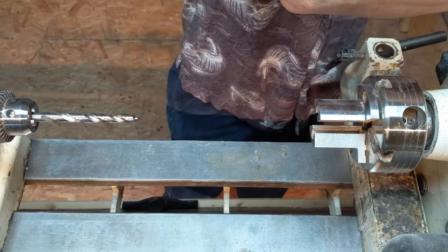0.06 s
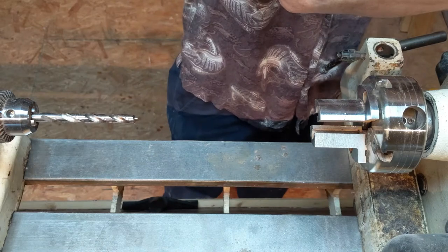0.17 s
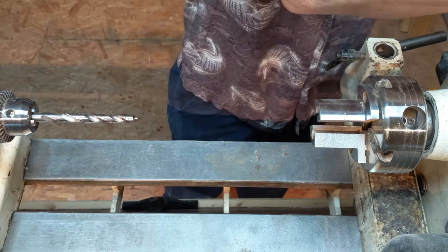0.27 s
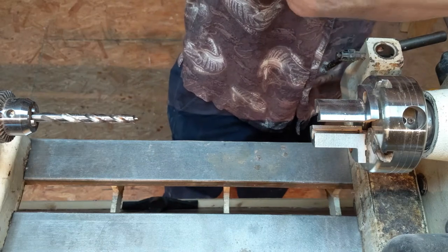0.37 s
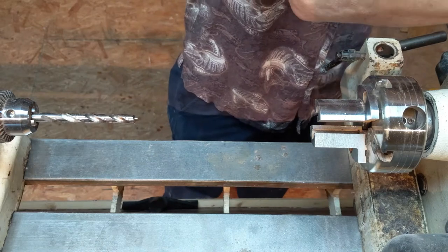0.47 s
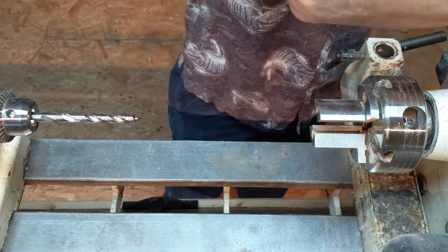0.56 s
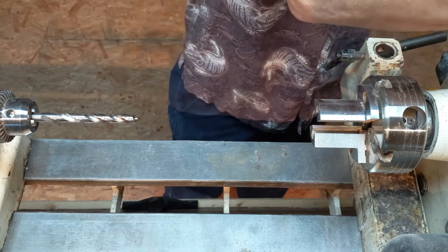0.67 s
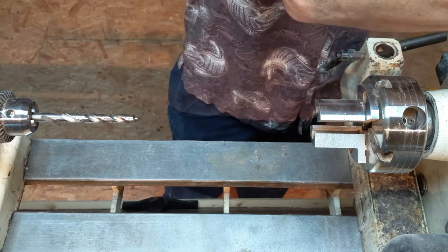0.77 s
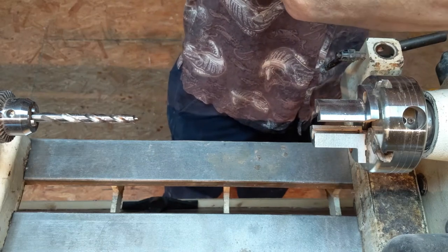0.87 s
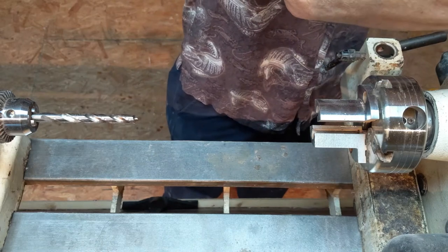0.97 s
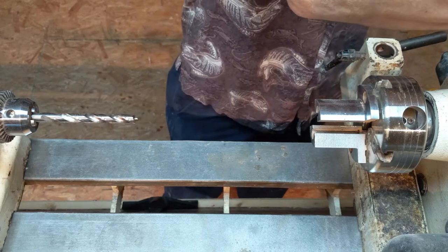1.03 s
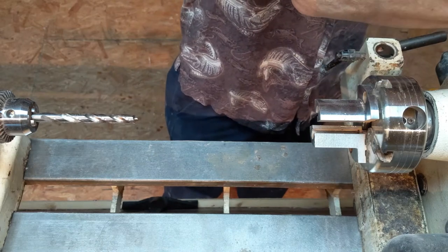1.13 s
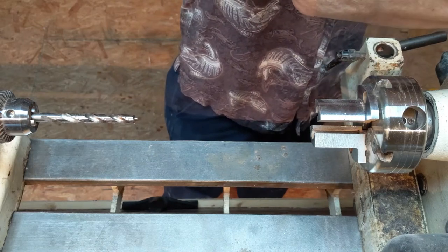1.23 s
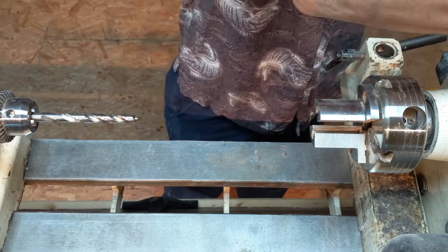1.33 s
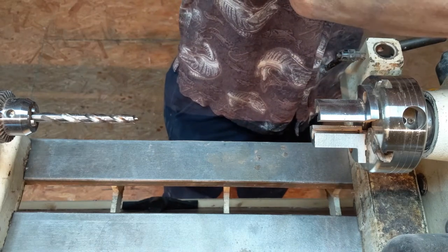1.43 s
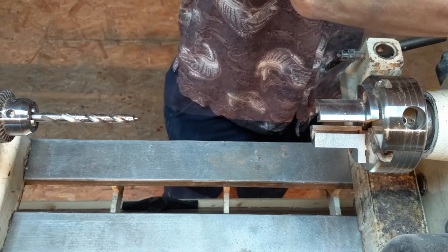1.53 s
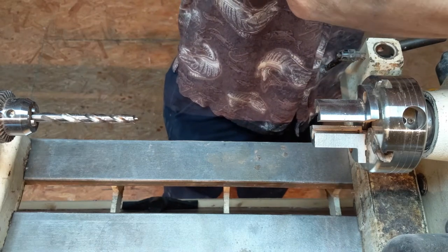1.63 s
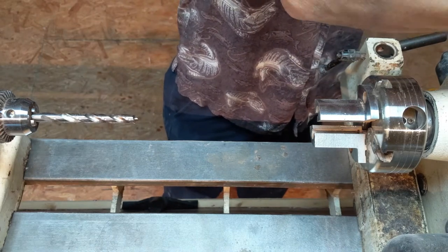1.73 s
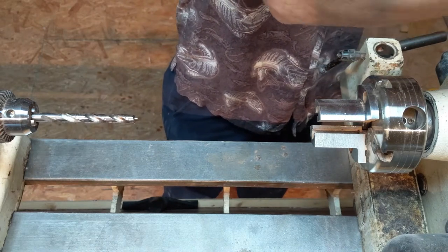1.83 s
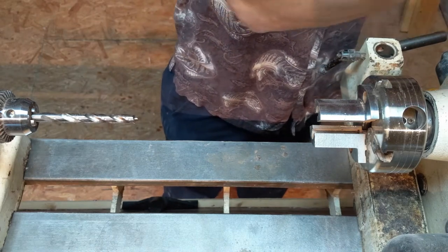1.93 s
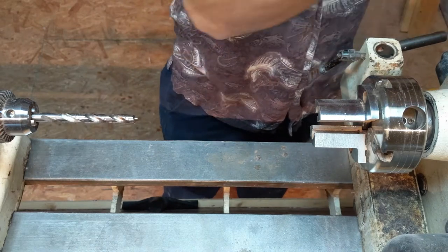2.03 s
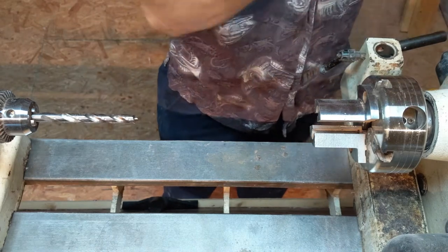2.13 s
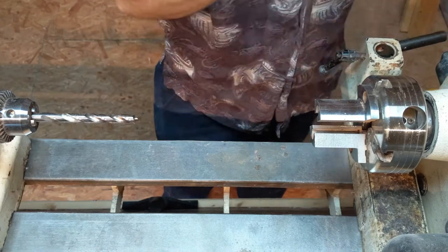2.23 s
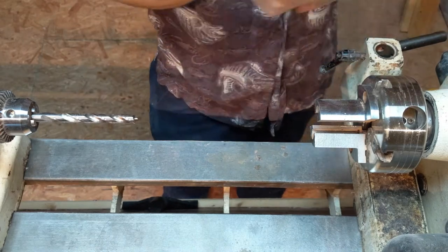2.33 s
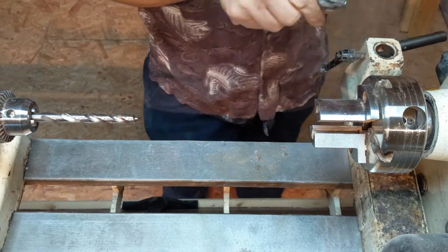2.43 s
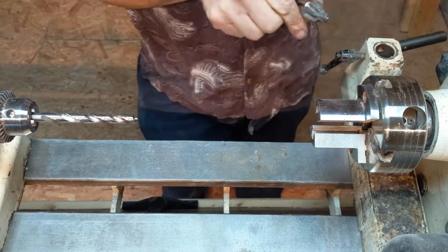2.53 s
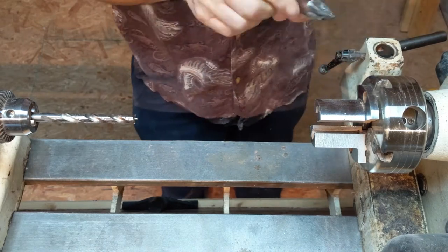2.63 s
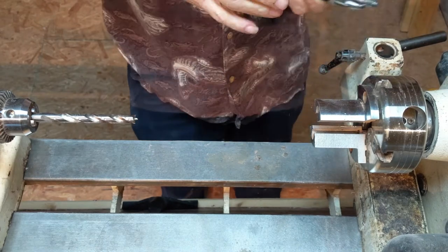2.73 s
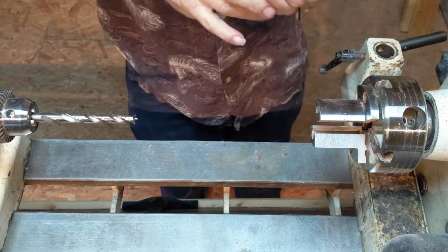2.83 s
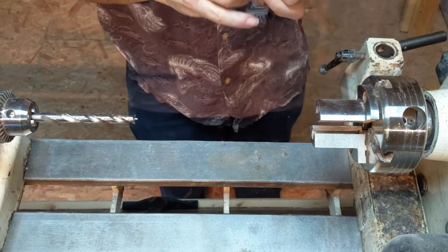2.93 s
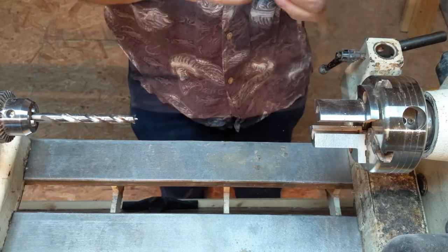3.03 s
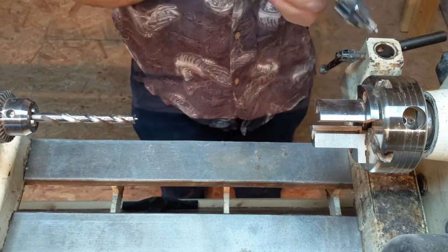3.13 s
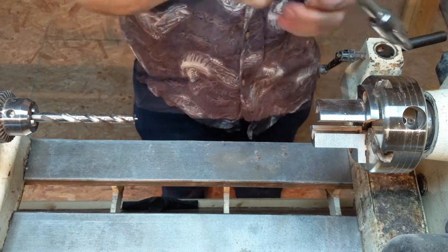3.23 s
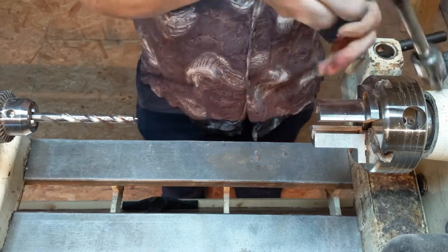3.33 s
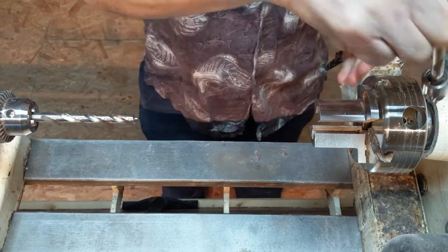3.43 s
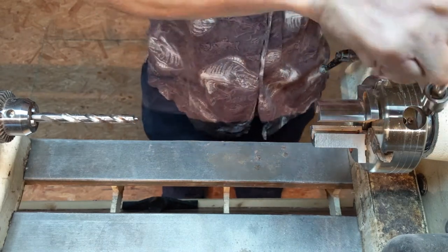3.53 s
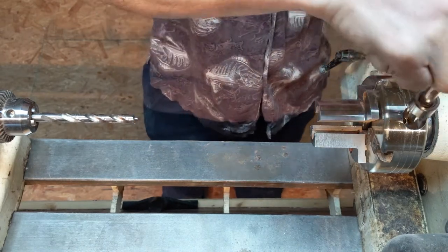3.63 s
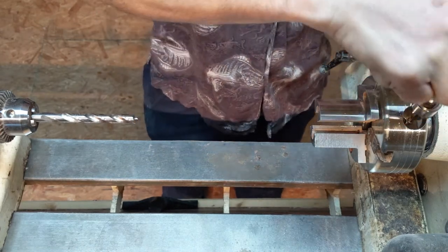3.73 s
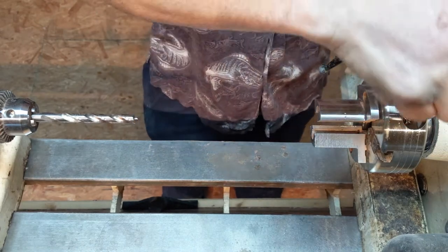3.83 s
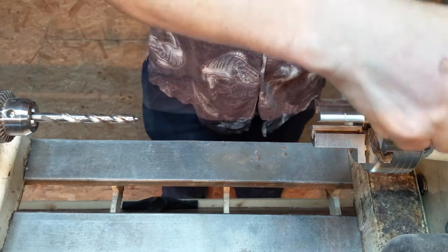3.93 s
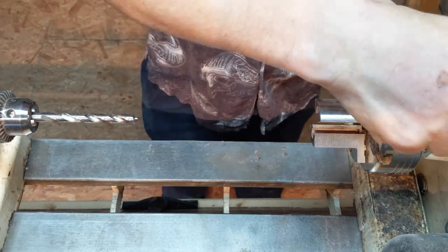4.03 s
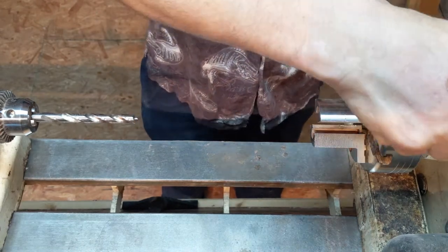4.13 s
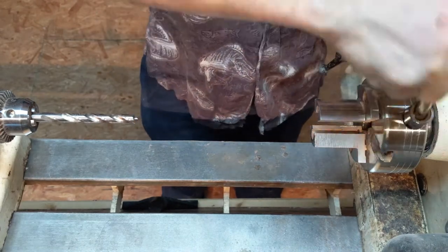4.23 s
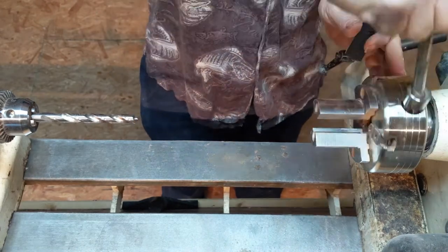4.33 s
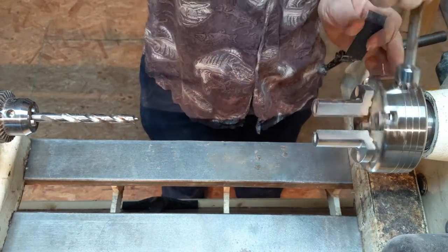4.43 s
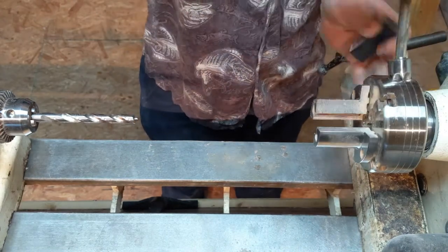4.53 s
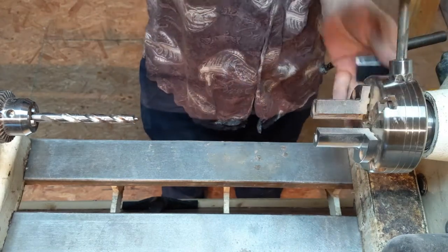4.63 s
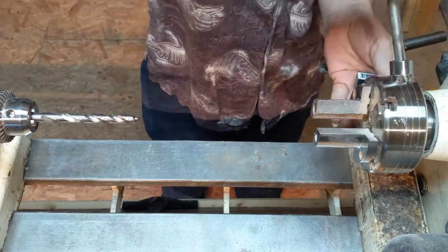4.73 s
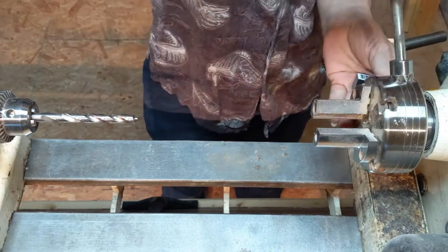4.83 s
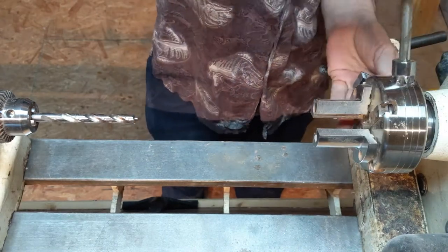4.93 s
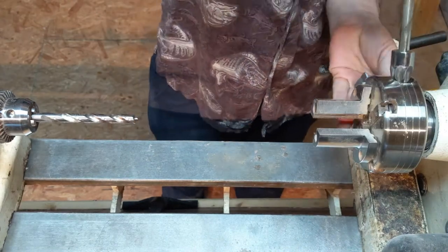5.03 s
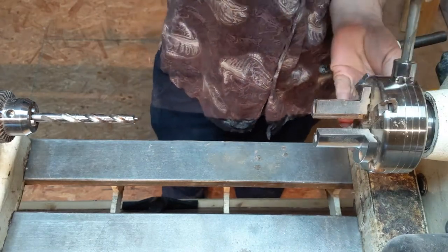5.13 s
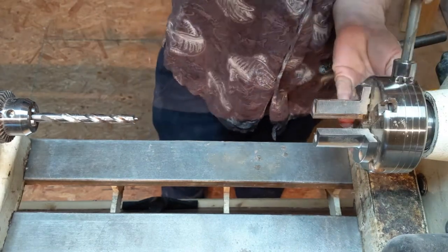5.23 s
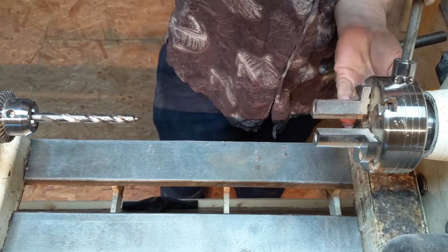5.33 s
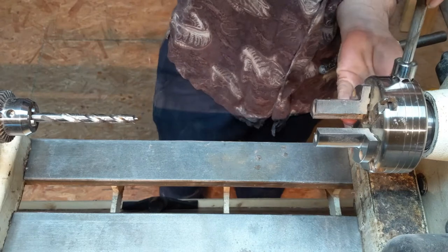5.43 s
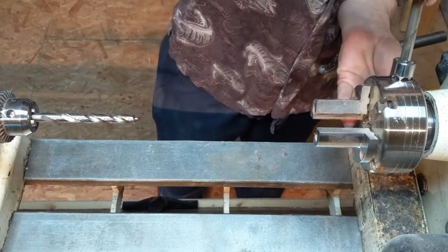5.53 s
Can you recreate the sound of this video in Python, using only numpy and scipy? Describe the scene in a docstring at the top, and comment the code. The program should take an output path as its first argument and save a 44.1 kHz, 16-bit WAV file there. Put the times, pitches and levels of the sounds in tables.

```python
"""Tools and a lathe chuck in a home workshop

Tools are shifted and dropped on a wooden bench, a steel key clinks in the hands, then turns in the lathe chuck.
Every contact is a burst of tiny random blows that rings a set of fading tones, with a small room's echo.
Faint pings are single fading tones; cloth and skin rustle as shaped noise that swells with each movement.
Behind them lie rumble and hiss made of shaped noise, and a quiet hum made of a wavering sine tone.
"""
import sys
import numpy as np
from scipy import signal
from scipy.fft import rfft, irfft, next_fast_len
from scipy.io import wavfile
from scipy.ndimage import map_coordinates

SR = 44100
rng = np.random.default_rng(int(sys.argv[2]) if len(sys.argv) > 2 else 0)


def digitize_waveform(pressure):
    """Quantize a signal to 16-bit integers and store it at the path in sys.argv[1].

    Rows of a 2-D input are taken as channels; values are limited to [-1, 1].
    """
    field = np.atleast_2d(pressure).T
    bounded = np.clip(field, -1, 1)
    quanta = np.round(bounded * 32767).astype(np.int16)
    wavfile.write(sys.argv[1], SR, quanta)


N = 246563  # length of the scene in samples


def amp(db):
    """Turns a level in dB into a gain."""
    return 10 ** (np.asarray(db) / 20)


def unit(x):
    """Scales a sound to an rms level of 1."""
    return x / np.sqrt(np.mean(x ** 2) + 1e-20)


def along(points, hz):
    """Reads a curve of (pitch_hz, value) points, joined by straight lines on a log pitch axis."""
    point_hz, value = np.transpose(points)
    return np.interp(np.log(hz + 1), np.log(point_hz + 1), value)


def wobble(rate):
    """A smooth random curve through `rate` random points a second."""
    knots = rng.standard_normal(int(N * rate / SR) + 4)
    return map_coordinates(knots, [np.arange(N) * rate / SR])


def filtered(x, response):
    """Multiplies each frequency of x by a response."""
    padded = next_fast_len(x.shape[-1] + 4096)
    spectrum = rfft(x, padded) * response(np.fft.rfftfreq(padded, 1 / SR))
    return irfft(spectrum, padded)[..., :x.shape[-1]]


def rush(spectrum, alike):
    """Stereo noise of rms 1 with a given tone colour and left-right likeness."""
    def weights(hz):
        # more middle than side makes left and right more alike
        turn = np.arccos(np.clip(along(alike, hz), -1, 1)) / 2
        return amp(along(spectrum, hz)) * [np.cos(turn), np.sin(turn)]

    mid, side = filtered(rng.standard_normal((2, N)), weights)
    return unit(np.array([mid + side, mid - side]))


def room_tail(size):
    """A fresh stereo room echo made of noise; each frequency dies at its own speed."""
    # how alike the echo is on both sides: pitch_hz, likeness (0 to 1)
    echo_alike = [(40, 0.27), (300, 0.44), (2000, 0.16)]
    # how long the echo takes to fall 60 dB: pitch_hz, fall_s
    echo_fall = [(100, 0.58), (500, 0.32), (2000, 0.19), (6000, 0.19), (14000, 0.13)]
    hz, t, (a, b) = signal.stft(rng.standard_normal((2, size)), SR, nperseg=256)
    turn = np.arccos(np.clip(along(echo_alike, hz), -1, 1))[:, None] / 2
    mid, side = np.cos(turn) * a, np.sin(turn) * b
    fade = amp(-60 * t / along(echo_fall, hz)[:, None])
    tail = signal.istft(np.array([mid + side, mid - side]) * fade, SR, nperseg=256)[1][:, :size]
    tail = tail * (1 - np.exp(-np.arange(size) / SR / 0.0011))  # the first walls need a few ms
    return tail / np.linalg.norm(tail[0])


def shares(hz):
    """Splits sound softly into thud, knock, click and treble shares that add up to 1."""
    # borders between the four bands: pitch_hz
    band_edges = [600, 1800, 5000]
    above = [1 / (1 + (edge / (hz + 1)) ** 8) for edge in band_edges]
    return np.array([1 - above[0], above[0] - above[1], above[1] - above[2], above[2]])


def strikes(hits, modes, thud, place, crack_db, room_db, rise, rough):
    """Each contact is a short chatter of tiny blows that rings the modes (natural tones) at new strengths.

    crack_db and room_db set the bare blows and the echo; rise is a share of the chatter time;
    rough sets how much the tones wander.
    """
    # small parts send out little deep bass and top treble: pitch_hz, level_db
    radiated = [(35, -25.5), (80, -1.5), (9000, 7.5), (12000, -1.5), (16000, -21.5)]
    detune = 0.008  # scatter of mode pitch from blow to blow, as a share of the pitch
    bass_lag_s, bass_hz = 0.00033, 790  # extra lag of the left in deep bass, and the pitch where it halves
    size, lead = SR // 2, 256  # samples for one contact, and the quiet samples before it
    out, t = np.zeros((2, N + size)), np.arange(size) / SR
    late = np.maximum(t - lead / SR, 0)  # seconds since the contact
    hz, level_db, t60 = np.transpose(modes)[:, :, None]
    # left-right contrast of thud, knock, click and treble: strongest in the click band
    shade = np.outer([0.76, 1.4, 2.6, 1.7], [.5, -.5])
    thud_db, thud_slope, thud_rise = thud
    when, lags, pans_db = np.transpose(place)

    for s, db, knock_db, treble_db, chatter in hits:
        lag_s = np.interp(s, when, lags)
        sides = amp(np.interp(s, when, pans_db) * shade)
        chatter = max(chatter, 1e-3)
        pressure = (1 - np.exp(-late / (rise * chatter))) * amp(-60 * late / chatter)
        blows = rng.standard_normal(size) * amp(3.6 * rng.standard_normal(size)) * pressure

        strength = amp(level_db + rng.normal(0, 2.5, hz.shape))
        pitch = hz * (1 + detune * rng.standard_normal(hz.shape))  # each grip loads the parts differently
        # loose parts in touch make every mode wander in phase
        steps = rng.standard_normal((len(hz), size))
        wander = rough * np.sqrt((hz + 700) / SR) * np.cumsum(steps, axis=1)
        swell = 1 - np.exp(-late * hz)  # low modes take longer to build up
        # each mode stores the energy of the blows and loses it at its own speed
        energy = signal.fftconvolve(pressure[None] ** 2, amp(-120 * t / t60), axes=1)[:, :size]
        tones = np.sin(2 * np.pi * pitch * t + wander)
        ring = strength * swell * np.sqrt(np.abs(energy)) * tones

        dry = ring.sum(axis=0) * (late > 0) + amp(crack_db) * blows
        echo = signal.fftconvolve(dry[None], room_tail(size), axes=1)[:, :size]
        heard = dry + amp(room_db) * echo

        def response(f):
            # the path to the left is longer, most of all for the bass
            left_lag_s = lag_s + bass_lag_s / (1 + (f / bass_hz) ** 2)
            shift = np.exp(1j * np.pi * f * left_lag_s * np.array([[-1], [1]]))
            return shares(f)[:, None] * amp(along(radiated, f)) * shift

        bands = filtered(heard[None], response)
        bands[0] *= 1 - np.exp(-late / thud_rise)  # the heavy frame is slow to move
        peaks = np.abs(bands).max(axis=(1, 2))
        band_db = db + np.array([thud_db + thud_slope * knock_db, knock_db, 0, treble_db])
        gains = amp(band_db) / peaks
        start = round(s * SR) - lead
        out[:, start:start + size] += np.einsum("b,bc,bcn->cn", gains, sides, bands)
    return out[:, :N]


def chuck():
    """The key turns in the chuck: pinion, scroll and jaws knock and ring through the cast bed."""
    # contacts: start_s, click_db (peak before panning), knock_db and treble_db (against the click),
    # chatter_s (time to fall 60 dB)
    chuck_hits = [(3.5737, -19, -11, -11, 0.027), (3.7771, -36.5, -6.5, -11, 0.0176),
                  (3.8268, -40, 5.5, -7.5, 0.024), (3.9415, -48, 10, -10, 0.083),
                  (3.9745, -31, 4, 1, 0.099), (3.9863, -34, 1, -5.5, 0.045), (4.0015, -21.5, -7, -9, 0.025),
                  (4.1972, -61.5, 16.5, -35, 0.12), (4.2582, -51, 15, -44, 0.0082),
                  (4.3755, -35.5, 3.5, -15.5, 0.064), (4.3856, -29, -10, -11.5, 0.036),
                  (4.418, -59, -18, 9, 0.04), (4.4784, -51, 13, -33, 0.029),
                  (4.537, -48, 14.5, -2.5, 0.056), (4.5448, -34, -12.5, -15, 0.0064),
                  (4.6524, -70.5, 12.5, -19, 0.2), (4.729, -47, -1, -15, 0.016),
                  (4.7509, -36, -4.5, -17.5, 0.024), (4.953, -64.5, 18, -26, 0.023),
                  (5.0454, -51, 10.5, -12, 0.043), (5.0684, -47.5, 7, -8, 0.063),
                  (5.0838, -35, -17, -7, 0.031), (5.110, -42, 6, -29, 0.039),
                  (5.1635, -37, 7.5, -12, 0.035), (5.1716, -25, -2, -9.5, 0.054),
                  (5.1841, -30.5, -10.5, -9.5, 0.035), (5.4395, -57, 12.5, -25, 0.095),
                  (5.455, -62.5, 5, -27, 0.048), (5.475, -40.5, 5, -11, 0.0083),
                  (5.4928, -39, 5.5, -11, 0.0097)]
    # ringing tones of chuck and bed: pitch_hz, level_db (relative), fall_s (time to fall 60 dB)
    chuck_modes = [(104, -10, 0.12), (300.2, -10, 0.12), (432, -14, 0.14), (555, -10, 0.11),
                   (888, -13, 0.09), (1045, -8, 0.15), (1440, -9, 0.1), (1540, -8, 0.07), (3290, -11, 0.08),
                   (4180, 12, 0.04), (4350, 3.5, 0.028), (5750, -1, 0.025), (9360, 4, 0.04),
                   (14200, 13, 0.02)]
    # thud: level_db (against the click at a knock of 0 dB), slope (dB per dB of knock), build_up_s
    chuck_thud = (-8, 0.74, 0.018)
    # turning the chuck moves the key: time_s, left_lag_s, left_over_right_db (before the band contrast)
    chuck_place = [(4.3, .00018, 3.3), (4.602, 0.000264, 3.2), (5.1, 0.0003, 2.36)]
    return strikes(chuck_hits, chuck_modes, chuck_thud, chuck_place,
                   crack_db=33.5, room_db=-1, rise=0.098, rough=0.28)


def bench():
    """Tools are shifted and dropped on the wooden bench, which rings briefly with each blow."""
    # contacts: start_s, click_db (peak before panning), knock_db and treble_db (against the click),
    # chatter_s (time to fall 60 dB)
    bench_hits = [(0.1365, -74.5, 25, -8, 0.014), (0.2626, -49, -4.5, -12.5, 0.12),
                  (0.4894, -32.5, -6, -26, 0.034), (0.5444, -31.5, 1.5, 3.5, 0.017),
                  (0.7484, -30.5, 3, -6.5, 0.068), (0.7624, -18.5, -20, -3.5, 0.029),
                  (0.845, -49.5, -12, -9, 0.04), (0.9402, -66.5, 18.5, -9, 0.02),
                  (1.2974, -63.5, 0.5, -14, 0.12), (1.371, -44, -2, -15, 0.077),
                  (1.3962, -35, 10.5, -11.5, 0.0085), (1.4017, -27, -6.5, -9, 0.073),
                  (1.4096, -13.5, -6.5, 5.5, 0.02), (1.4765, -32.5, 10.5, -9, 0.008),
                  (1.4872, -37, 7, -14, 0.0073), (1.4955, -21, -24, -20, 0.062),
                  (1.5182, -26.5, -5, -10.5, 0.048)]
    # ringing tones of bench and tools: pitch_hz, level_db (relative), fall_s (time to fall 60 dB)
    bench_modes = [(99.75, 2.5, 0.26), (238.1, -12.5, .15), (330, -3, 0.086), (582.8, -4.5, 0.22),
                   (794.6, -1.5, 0.035), (926.7, 2, 0.051), (1071, 2.5, 0.04), (1387, -3.5, 0.042),
                   (2280, -5.5, 0.027), (3267, -8.5, 0.044), (4190, -5.5, 0.0057), (5640, -15.5, 0.059)]
    # thud: level_db (against the click at a knock of 0 dB), slope (dB per dB of knock), build_up_s
    bench_thud = (-19, 1, 0.005)
    # where it is heard from: time_s, left_lag_s, left_over_right_db (before the band contrast)
    bench_place = [(0, 0.000048, 2.5)]
    return strikes(bench_hits, bench_modes, bench_thud, bench_place,
                   crack_db=20.5, room_db=-3.5, rise=0.04, rough=0.49)


def key():
    """The steel key clinks in the hands, with short bright tones."""
    # contacts: start_s, click_db (peak before panning), knock_db and treble_db (against the click),
    # chatter_s (time to fall 60 dB)
    key_hits = [(2.4157, -36.5, -17.5, 0, 0.0043), (2.4191, -38.5, -15.5, -5, 0.0039),
                (2.4397, -52, -22, 5.5, 0.012), (2.5037, -60, -5, -1, 0.015), (2.5636, -59, 1.5, 1, 0.0067),
                (2.6404, -65, -4.5, 1, 0.0075)]
    # ringing tones of the key: pitch_hz, level_db (relative), fall_s (time to fall 60 dB)
    key_modes = [(1518, 5, 0.018), (2170, -36, 0.51), (2763, 2, 0.03), (3400, -9, 0.21), (4080, 6, 0.015),
                 (9400, -1, 0.084), (12000, 5.5, 0.069)]
    # thud: level_db (against the click at a knock of 0 dB), slope (dB per dB of knock), build_up_s
    key_thud = (-12.5, 1, 0.0057)
    # where it is heard from: time_s, left_lag_s, left_over_right_db (before the band contrast)
    key_place = [(2.4, 0.0000265, 3.2)]
    return strikes(key_hits, key_modes, key_thud, key_place,
                   crack_db=26.5, room_db=-1.5, rise=0.013, rough=0.55)


def pings():
    """Small parts ring alone: single tones that start softly and die away, louder on the left."""
    # faint tones: start_s, pitch_hz, level_db (before soft start and panning), fall_s (to fall 60 dB)
    ping_tones = [(1.584, 348, -53.5, 0.51), (2.062, 1550, -69, 0.16), (2.17, 1566, -71.5, 0.11),
                  (2.51, 2160, -64, 0.18), (2.645, 3700, -66, 0.074)]
    s, hz, db, t60 = np.transpose(ping_tones)[:, :, None]
    age = np.maximum(np.arange(N) / SR - s, 0)
    loudness = amp(db - 60 * age / t60) * (1 - np.exp(-age / 0.0022))
    tones = loudness * np.sin(2 * np.pi * hz * age)
    return tones.sum(axis=0) * amp([[2.5], [-2.5]])


def rustle():
    """Fingers rub on steel and sleeves brush: uneven noise that swells and fades with each movement."""
    # brushing movements: middle_s, half_length_s, skin_db and cloth_db (before wobble and panning)
    strokes = [(0.36, 0.053, -70.5, -68.5), (0.544, 0.05, -67.5, -50), (0.576, 0.014, -72, -68),
               (0.69, 0.065, -64.5, -54), (1.686, 0.029, -71, -67), (2.028, 0.052, -89, -70),
               (2.176, 0.18, -74.5, -70.5), (2.924, 0.044, -64.5, -77), (3.076, 0.065, -71, -99),
               (3.188, 0.031, -73.5, -93), (4.693, 0.085, -82, -60.5), (4.887, 0.15, -89.5, -67.5),
               (5.364, 0.087, -89.5, -68)]
    # tone colour of skin on steel: pitch_hz, level_db (relative, per Hz)
    skin_colour = [(880, -27), (1500, -36), (2080, 1.5), (9280, 1.5), (16000, -5)]
    # tone colour of cloth: pitch_hz, level_db (relative, per Hz)
    cloth_colour = [(71, -43), (120, -17), (307, -2.5), (587, -10), (1500, -16), (5500, -49.5)]
    t = np.arange(N) / SR
    middle, half, skin_db, cloth_db = np.transpose(strokes)[:, :, None]
    speed = np.exp(-((t - middle) / half) ** 2)
    skin_level = np.sum(amp(skin_db) * speed, axis=0) * amp(1.7 * wobble(59))
    cloth_level = np.sum(amp(cloth_db) * speed, axis=0) * amp(2.7 * wobble(30))
    skin = skin_level * rush(skin_colour, [(1000, 0.11)])
    cloth = cloth_level * rush(cloth_colour, [(1000, 0.081)])
    return (skin + cloth) * amp([[1.5], [-1.5]])


def floor():
    """Rumble and hiss are shaped noise that drifts a little; the mains hum is a wavering sine tone."""
    # tone colour of rumble and hiss: pitch_hz, level_db (relative, per Hz)
    floor_colour = [(8.8, -30), (15, -5.5), (59, -11.5), (184, -29.5), (240, -23), (312, -30.5),
                    (382, -28.5), (417, -25.5), (972, -33.5), (1230, -39.5), (6290, -38), (16000, -46)]
    # how alike left and right are: pitch_hz, likeness (0 to 1)
    floor_alike = [(40, .9), (240, .2), (1000, .1), (4000, .2), (15000, 0)]
    # mains hum: pitch_hz, level_db (of the sine's peak, before it wavers)
    hum_tones = [(240, -82.5)]
    t = np.arange(N) / SR
    hum = sum(amp(db + 2.9 * wobble(42)) * np.sin(2 * np.pi * hz * t) for hz, db in hum_tones)
    level = amp(-64.5 + 0.7 * wobble(22))  # drifts around -64.5 dB rms, before panning
    return level * rush(floor_colour, floor_alike) * amp([[.6], [-.6]]) + hum


def scene():
    """Adds up all the sources in stereo."""
    return chuck() + bench() + key() + pings() + rustle() + floor()


def record(dry):
    """Keeps only the sound below 16 kHz."""
    top_hz = 16000
    return filtered(dry, lambda hz: hz < top_hz)


dry = scene()
out = record(dry)
digitize_waveform(out)
```